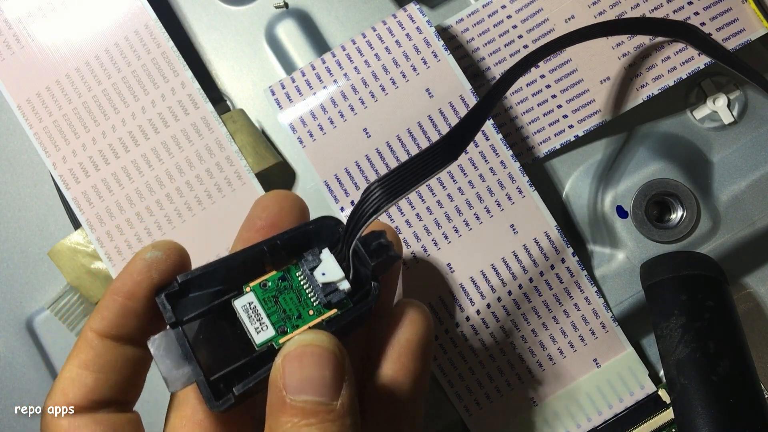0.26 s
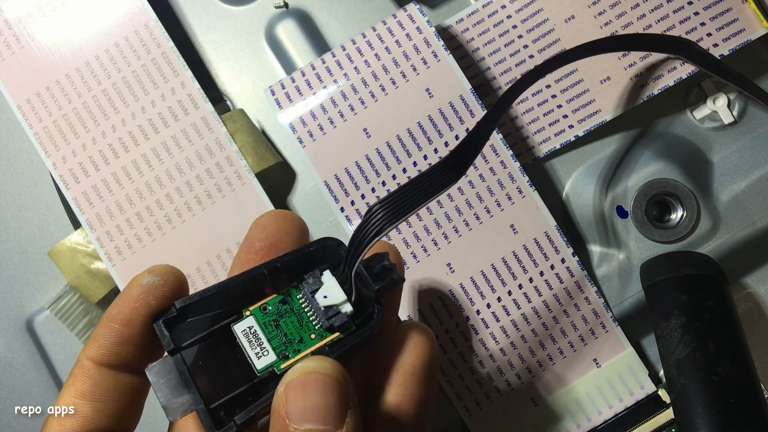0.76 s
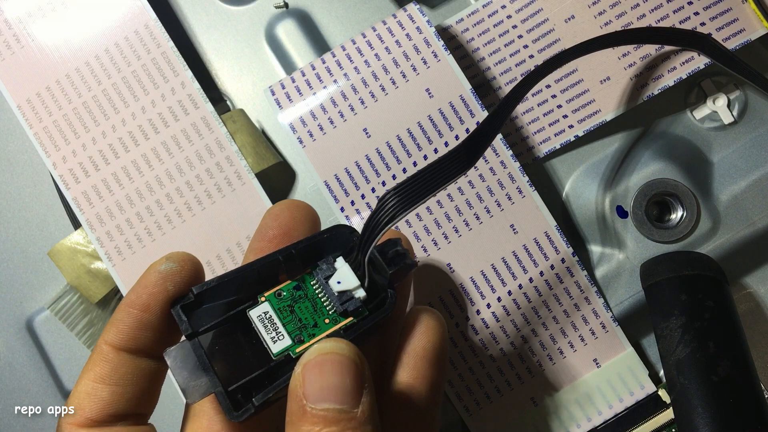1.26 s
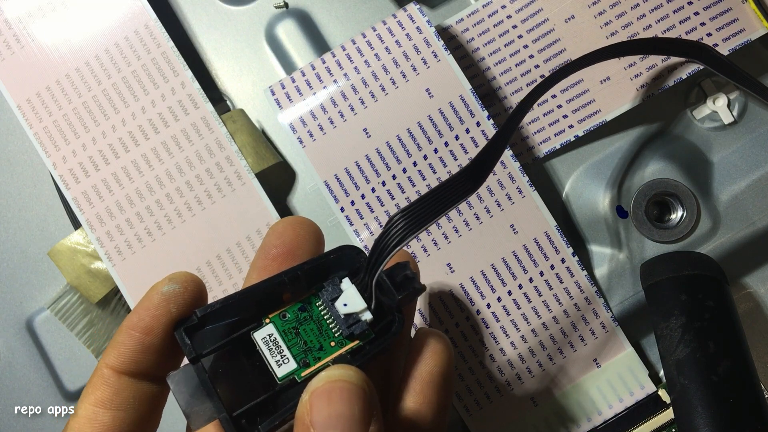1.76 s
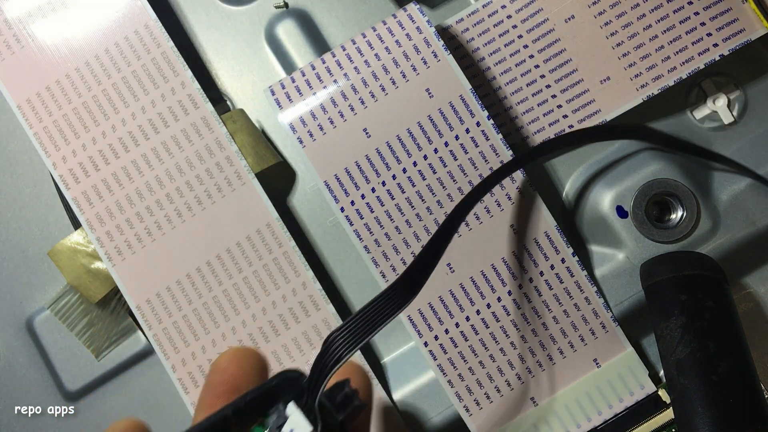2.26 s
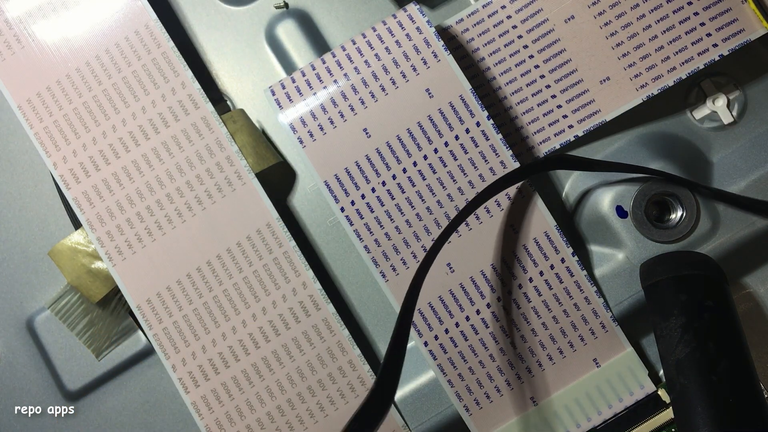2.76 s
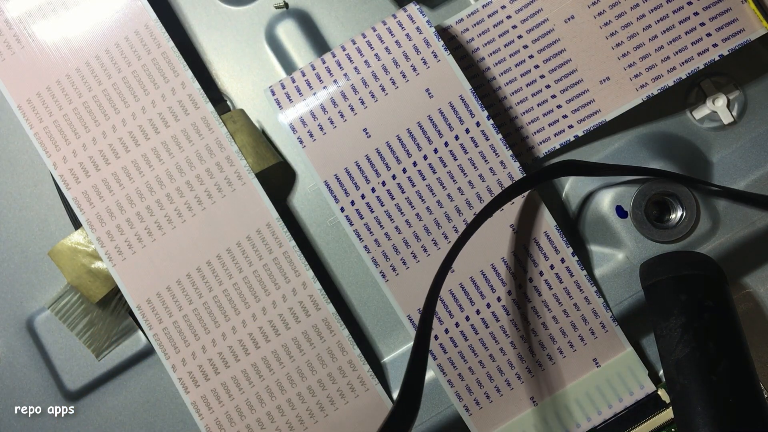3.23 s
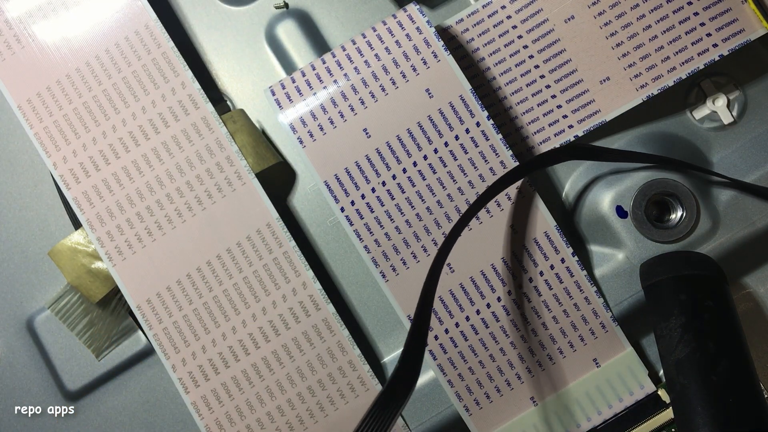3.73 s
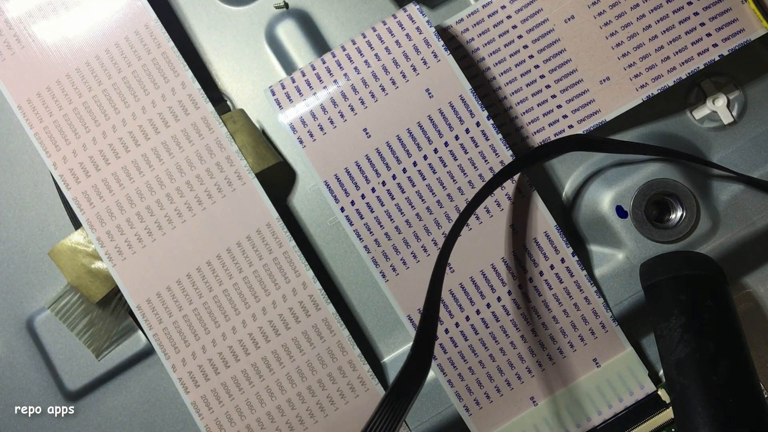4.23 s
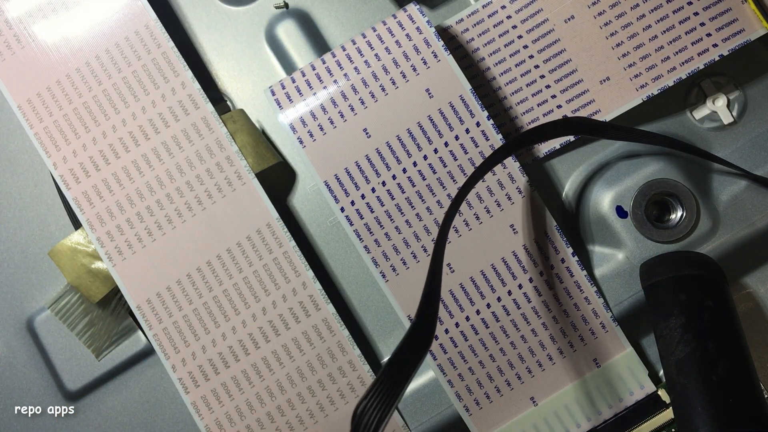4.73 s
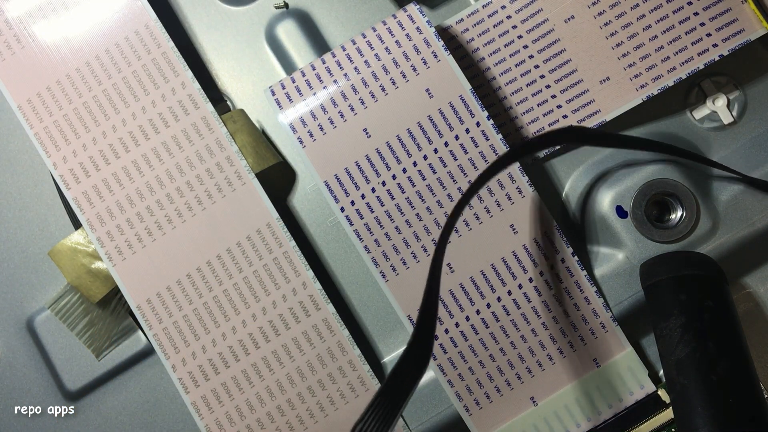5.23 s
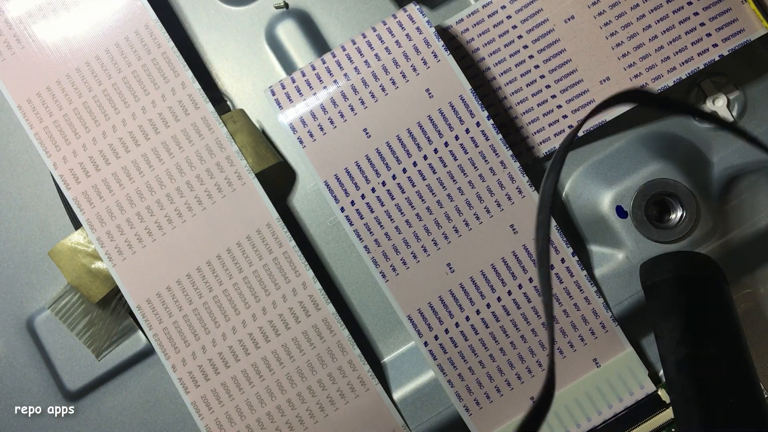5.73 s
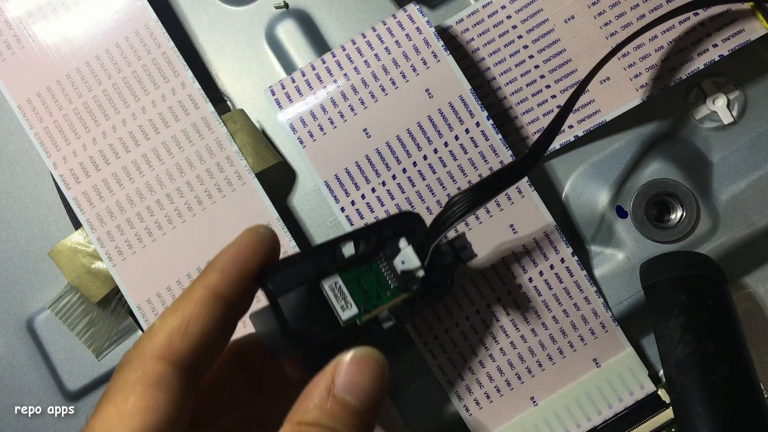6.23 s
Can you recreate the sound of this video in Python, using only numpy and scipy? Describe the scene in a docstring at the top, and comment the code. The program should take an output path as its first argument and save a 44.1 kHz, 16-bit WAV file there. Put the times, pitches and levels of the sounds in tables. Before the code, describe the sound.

A small plastic module is handled close up over a sheet-metal panel, in a small room with a very faint hum of air. A light tap comes right at the start. At 0.8 seconds a hard knock gives a sharp plastic crack, a brief metal ring and a low thump, followed by smaller taps near 1 and 1.5 seconds. Fingers and a cable rub softly, and two more knocks land around 2.2 and 2.4 seconds. From 3 seconds the handling turns busy, with quick taps, gritty scraping, panel rattle and thin, high clinks from a loose metal part. The loudest flurry of sharp knocks falls between 4.6 and 5 seconds. After that only soft rubbing remains, with a few small, dry plastic clicks from about 5.9 to 6.4 seconds.

```python
"""A small plastic module is turned in the hand, close up, and knocked on a sheet-metal panel.
Over a faint hum of air come light taps, then a hard knock at 0.8 s: the shell cracks, the panel rings,
its heavy frame thumps and a small cluttered room answers. Fingers and cable rub on, with more knocks
after 2.2 s. From 3 s the handling turns busy and a loose metal part clinks. The loudest flurry lands
between 4.6 and 5 s, and the scene tails off in soft rubbing and small plastic clicks."""
import sys
import numpy as np
from scipy import signal
from scipy.fft import rfft, irfft
from scipy.io import wavfile
from scipy.ndimage import uniform_filter1d

SR = 44100
rng = np.random.default_rng(int(sys.argv[2]) if len(sys.argv) > 2 else 0)


def to_wav(s):
    """Save 16-bit WAV."""
    ch = np.atleast_2d(s).T  # columns
    pcm = np.round(np.clip(ch, -1, 1) * 32767)  # PCM
    wavfile.write(sys.argv[1], SR, pcm.astype(np.int16))


N = 286209


def gain_of(db):
    """dB to amplitude."""
    return 10 ** (np.asarray(db) / 20)


def unit_rms(x):
    """Normalises to rms 1."""
    return x / np.sqrt(np.mean(x ** 2) + 1e-20)


def curve_at(points, hz):
    """Reads a curve on a log-frequency axis."""
    f, value = np.transpose(points)
    return np.interp(np.log(hz + 1), np.log(f + 1), value)


def add(mix, s, sound):
    """Mixes a sound in at time s."""
    part = mix[round(s * SR):][:len(sound)]
    part += sound[:len(part)]


def attack(size, rise_s):
    """A smooth fade-in."""
    return 1 - np.exp(-(np.arange(size) / (rise_s * SR)) ** 2)


def noise(spectrum, size, eq_db=lambda hz: 0):
    """Noise of rms 1 with the given spectrum and an extra EQ."""
    hz = np.fft.rfftfreq(size, 1 / SR)
    shape = gain_of(curve_at(spectrum, hz) + eq_db(hz))
    return unit_rms(irfft(rfft(rng.standard_normal(size)) * shape, size))


def resonate(x, hz, width_hz):
    """A sweepable band-pass: shifts hz down to zero, smooths, and shifts back."""
    turn = np.exp(2j * np.pi * np.cumsum(hz * np.ones(len(x))) / SR)
    pole = np.exp(-np.pi * width_hz / SR)
    return unit_rms((turn * signal.lfilter([1 - pole], [1, -pole], x / turn)).real)


def ring(modes, size, lift_db=0, tuning=0.96, damping=0.99, spread_db=0):
    """Struck modes at random phases; tuning multiplies their pitch, damping divides their t60."""
    hz, db, t60 = np.transpose(modes)[:, :, None]
    t = np.arange(size) / SR
    strike_spot = rng.standard_normal((len(modes), 1))  # makes each mode louder or softer
    height = gain_of(db + np.reshape(lift_db, (-1, 1)) + spread_db * strike_spot)
    tones = np.sin(2 * np.pi * (hz * tuning * t + rng.random(strike_spot.shape)))
    return (height * gain_of(-60 * damping * t / t60) * tones).sum(0) / np.linalg.norm(height)


# Room tone: f/Hz, level/dB
AIR_SPECTRUM = [(15, -38), (25, -10), (80, -0.5), (163, -6.5), (339, -2), (568, -15), (2090, -20),
                (2900, -26), (8830, -25), (10400, -29.5), (12900, -25), (15200, -31.5), (16500, -43)]


def air():
    """The bed: a faint, steady hum of air."""
    return gain_of(-69.5) * noise(AIR_SPECTRUM, N)


# Reverb time of the small room: f/Hz, t60/s
ROOM_DECAY = [(100, 0.25), (350, 0.32), (1000, 0.2), (2500, 0.36), (6400, 0.26), (14000, 0.21)]


def room(send):
    """Dense echoes build up quickly, and each band dies at its own speed."""
    hz, t, bands = signal.stft(rng.standard_normal(SR // 2), SR, nperseg=256)
    tail = signal.istft(bands * gain_of(-60 * t / curve_at(ROOM_DECAY, hz)[:, None]), SR, nperseg=256)[1]
    tail *= attack(len(tail), rise_s=0.0067)
    return signal.fftconvolve(send, tail / np.linalg.norm(tail))[:N]


def slips(per_s, spread_db):
    """Tiny contacts at random moments; a few are large."""
    strength = gain_of(spread_db * np.minimum(rng.exponential(1, N), 4))
    return strength * (rng.random(N) < per_s / SR) * rng.choice([-1, 1], N)


def loose_bits(spectrum, low_hz, high_hz, per_s, t60):
    """Twenty loose bits tick, each on its own short note."""
    t = np.arange(1500) / SR
    notes = (np.sin(2 * np.pi * hz * t) * gain_of(curve_at(spectrum, hz) - 60 * t / t60)
             for hz in np.geomspace(low_hz, high_hz, 20))
    return unit_rms(sum(signal.oaconvolve(slips(per_s, 3.5), note)[:N] for note in notes))


# Finger and cable cues: t/s at full level, swell/s per 20 dB (floored at 1/50), hold/s,
# fade/s per 20 dB (floored at 1/30), frame shudder/dB, panel rattle/dB, rub/dB, skin hiss/dB,
# rub resonance/Hz, hiss resonance/Hz, rasp amount
STROKE_CUES = [(0.0, .02, 0.0087, 0.08, -35, -51.5, -61, -62, 1196, 5580, .3),
               (0.19, 4.7, 0.017, 0.24, -49, -61.5, -64, -81, 1170, 5330, .45),
               (0.323, 0.6, 0.07, .5, -69, -79, -64.5, -68, 1700, 5900, .25),
               (0.382, -0.3, 0.016, 0.2, -78, -80, -63, -68.5, 1760, 5760, 0.14),
               (0.799, 0.2, 0.028, 0.37, -79, -77, -65.5, -69, 2050, 6340, .45),
               (0.849, -0.38, 0.11, .2, -52, -67, -61.5, -64, 1720, 4520, .55),
               (1.049, -0.13, 0.0091, 0.24, -47.5, -62.5, -57.5, -61, 1520, 4870, .45),
               (1.27, 0.1, 0.066, 0.4, -60, -70, -63, -67, 2062, 5430, .35),
               (1.398, 0.26, 0.11, 0.22, -63, -74.5, -58.5, -62, 1572, 5330, 0.15),
               (2.19, 0.33, 0.022, 0.26, -81, -74.5, -63.5, -68, 1950, 5200, .6),
               (2.25, .03, 0.09, 0.13, -66, -77, -63, -66, 1570, 4870, .45),
               (2.386, -0.1, .02, .15, -61, -70, -61, -61, 1285, 5110, .45),
               (2.523, -0.02, 0.0049, 0.17, -76, -58, -61.5, -89, 1160, 5830, .45),
               (2.549, -0.1, .02, .15, -76, -80, -74, -67.5, 1496, 6320, .4),
               (2.619, -0.8, 0.018, .25, -69, -70, -63, -71.5, 1645, 6710, .65),
               (3.064, 0.08, 0.056, -0.2, -63.5, -54, -58, -59, 1320, 5450, .6),
               (3.144, 0.02, 0.046, -0.04, -42, -42, -46.5, -59, 1290, 5440, .55),
               (3.241, 0.0563, 0.13, 0.0239, -42, -42.5, -48, -55, 1340, 5570, .46),
               (3.398, 0.01, 0.021, .08, -45, -46.5, -50, -59.5, 1227, 5100, 0.9),
               (3.531, 0.4, 0.064, 0.15, -50.5, -58.5, -71, -65, 1700, 5130, .45),
               (3.791, 0.15, 0.044, -0.37, -53, -56, -68, -87, 1296, 5040, .44),
               (3.891, 0.16, 0.07, 0.29, -52, -52, -59, -69, 1250, 5230, .4),
               (4.056, -0.02, 0.012, 0.17, -54.5, -56, -51.5, -67, 1157, 7200, .45),
               (4.16, -0.07, 0.065, -0.5, -53.5, -59, -70, -59, 1350, 5900, .78),
               (4.251, -0.33, 0.083, -0.36, -67, -68, -73, -60.5, 1520, 4850, 1.3),
               (4.307, -0.25, 0.039, 0.08, -48, -54.5, -64, -59, 1515, 4790, .6),
               (4.6, 0.7, .02, 1, -64, -67.5, -71.5, -76.5, 1250, 7600, .45),
               (4.633, -0.0744, .01, -0.03, -64, -36.5, -43.5, -75, 1384, 4660, .45),
               (4.757, 0.0462, 0.051, 0.06, -45.5, -45.5, -49.5, -49, 1360, 4520, .55),
               (4.871, 0.0969, 0.051, 0.0174, -46, -39.5, -49.5, -49.5, 1180, 4910, .45),
               (4.95, 0.0124, 0.026, 0.1079, -53.5, -35, -36.5, -39.5, 1400, 5380, .4),
               (5.06, 0, 0.018, 0.105, -54.5, -51.5, -51, -64, 1363, 5450, 0.32),
               (5.241, 0.5, .03, .04, -71, -69, -66.5, -74, 2160, 5000, 0.39),
               (5.294, .025, 0.038, 0.13, -61.5, -67, -71.5, -66.5, 1198, 9100, 1.56),
               (5.426, -0.36, 0.052, 0.02, -65, -71.5, -67, -67.5, 2550, 6240, 0.58),
               (5.653, 1, 0.057, -1.4, -78, -76, -79, -83, 1984, 6750, 0.87),
               (5.775, 0.07, .03, 0.55, -67, -79, -79.5, -72, 1820, 8730, 1.7),
               (5.863, 0, 0.064, 0.2, -72, -90, -64.5, -68.5, 2590, 6400, 2),
               (5.978, -0.07, 0.033, 0.66, -87, -72, -65.5, -76, 2493, 6290, 0.96),
               (6.107, 0, 0.0088, 0, -66, -58.5, -60, -72, 2134, 5580, 1.2),
               (6.254, -0.06, 0.043, -0.3, -80, -80.5, -68, -76, 2100, 6300, .9),
               (6.47, 0.2, .02, .05, -72, -88, -83, -82, 2245, 6060, 1.1)]
# Floor of the resting hand: shudder/dB, rattle/dB, rub/dB, hiss/dB
RESTING_LEVELS = [-69, -82.5, -84.5, -85]
# Its tone: rub resonance/Hz, hiss resonance/Hz, rasp amount
RESTING_TONE = [1500, 5800, .25]


def strokes():
    """Level and tone automation: each stroke swells, holds and fades; the strongest leads the tone."""
    s, swell, hold, fade, *columns = np.transpose(STROKE_CUES)[:, :, None]
    levels_db, tones = columns[:4], columns[4:]
    t = np.arange(0, N / SR, 1 / 1000)
    early = (s - t) / np.maximum(swell, 1 / 50)
    late = (t - s - hold) / np.maximum(fade, 1 / 30)
    power = gain_of(-40 * np.maximum(np.maximum(early, late), 0))
    faders = [np.sqrt((power * gain_of(2 * db)).sum(0) + gain_of(2 * rest))
              for db, rest in zip(levels_db, RESTING_LEVELS)]
    weight = power * gain_of(levels_db[2] + levels_db[3])  # by rub and hiss
    resting = gain_of(RESTING_LEVELS[2] + RESTING_LEVELS[3])
    colours = [((weight * tone).sum(0) + resting * rest) / (weight.sum(0) + resting)
               for tone, rest in zip(tones, RESTING_TONE)]
    return [np.interp(np.arange(N) / SR, t, lane) for lane in faders + colours]


# Midrange of rubbing skin and cable: f/Hz, level/dB
RUB_SPECTRUM = [(470, -32), (800, -6), (1040, -3), (1480, -6.5), (1760, -4), (2070, -8.5), (2490, -7),
                (5000, -20.5), (6500, -47.5), (11000, -120)]
# Dry top end of skin hiss and ticks: f/Hz, level/dB
TREBLE_SPECTRUM = [(2060, -26.5), (3500, -2.5), (3810, -6.5), (5070, -10.5), (5840, -8), (10800, -16),
                   (12900, -19.5), (15800, -24.5), (16200, -29), (16500, -52.5)]


def handling():
    """Small slips shake frame and panel; skin and cable rub in gritty bursts."""
    shudder_gain, rattle_gain, rub_gain, hiss_gain, rub_hz, hiss_hz, rasp = strokes()
    shudder = unit_rms(signal.oaconvolve(slips(60, 6.6), ring(FRAME_MODES, SR // 2))[:N])
    rattle = unit_rms(signal.oaconvolve(slips(400, 1.3), ring(PANEL_MODES, SR // 4))[:N])
    grit = 0.75 + 0.2 * unit_rms(signal.lfilter([1], [1, -0.996], abs(slips(250, 3))))
    rub, hiss = noise(RUB_SPECTRUM, N, shell_eq), noise(TREBLE_SPECTRUM, N)
    rub = 0.65 * rub + rasp * (resonate(rub, rub_hz, 200) + 0.44 * resonate(rub, 1.45 * rub_hz, 250))
    hiss = 0.79 * hiss + 0.5 * rasp * resonate(hiss, hiss_hz, 540)
    rattle += gain_of(-23.5) * loose_bits(TREBLE_SPECTRUM, 4100, 18000, per_s=25, t60=0.04)
    rattle += gain_of(-6.5) * loose_bits(RUB_SPECTRUM, 1000, 3600, per_s=9, t60=0.033)
    return shudder_gain * shudder + rattle_gain * rattle + grit * (rub_gain * rub + hiss_gain * hiss)


# Modes of the loose metal part, in low, middle and high groups: pitch ratio, level/dB, undamped t60/s
METAL_MODES = [
    [(.6, -2.5, .1), (.7, -7, 0.11), (.99, -1.5, .2), (1.0, 5, 0.16), (1.015, -14.5, .15)],
    [(.99, -10, .15), (1.0, 2, 0.23), (1.085, 2, .15), (1.1, -3, .15)],
    [(.985, 9, 0.15), (1.0, -5.5, 0.27), (1.012, 2, 0.22)],
]
# Clink cues: t/s, low/dB, middle/dB, high/dB, low pitch/Hz, middle pitch/Hz, damping factor
CLINK_CUES = [(3.09, -48.5, -56.5, -68, 5400, 8700, 0.93), (3.172, -40, -57, -64, 5410, 8850, 0.57),
              (3.262, -73, -55, -58, 5430, 8600, 0.98), (3.40, -77, -68, -75, 5430, 8750, 1.7),
              (3.769, -54, -63, -76, 5780, 8740, 1.07), (3.885, -54, -62, -70, 5570, 8750, 0.78),
              (4.084, -70, -44, -47, 5430, 8140, 1.3), (4.102, -42, -66, -60, 6350, 9200, 2.3),
              (4.293, -49, -61, -75, 4670, 8500, 1.3), (4.321, -42, -72, -69, 4660, 8750, 4.6),
              (4.734, -50, -52, -49, 5430, 8400, 0.76)]


def clinks(high_hz=12900):
    """The loose metal part keeps rattling as it rings, so its notes are rough."""
    out, size = np.zeros(N), SR // 4
    for s, *levels_db, low_hz, middle_hz, damping in CLINK_CUES:
        for modes, db, hz in zip(METAL_MODES, levels_db, (low_hz, middle_hz, high_hz)):
            rattle = unit_rms(uniform_filter1d(rng.standard_normal(size), size=120))
            note = ring(modes, size, tuning=hz, damping=damping, spread_db=-0.5)
            add(out, s, gain_of(db) * note * (1 + 0.8 * rattle))
    return out


def focus(modes, centre_hz, db_per_octave):
    """Modes close to the favoured pitch are driven hardest."""
    return -db_per_octave * abs(np.log2(np.transpose(modes)[0] / centre_hz))


# Modes of the heavy frame, before tuning and damping: f/Hz, level/dB, t60/s
FRAME_MODES = [(45, -8.5, 0.35), (56.1, -11.5, 0.71), (58.6, 1.5, 0.26), (73.2, 2, 0.27), (93, -8.5, 0.27),
               (131.4, 0.5, 0.16), (170.5, -5.5, 0.14), (199, -5.5, 0.15)]


def frame_thump():
    """The low end of a knock: the heavy frame gets going late."""
    drive_db = focus(FRAME_MODES, centre_hz=73.6, db_per_octave=4)
    return ring(FRAME_MODES, SR // 2, drive_db, spread_db=-3) * attack(SR // 2, rise_s=0.0029)


# Modes of the sheet metal, before tuning and damping: f/Hz, level/dB, t60/s
PANEL_MODES = [(250.8, 0, 0.11), (333.4, 0, 0.096), (362.7, -7.5, .2), (384, -0.5, 0.093),
               (452, -6.5, 0.14), (515.4, -8.5, 0.19), (555.5, 0.5, 0.089), (620, -14.5, 0.05),
               (661, 7, 0.045), (797, -6, 0.12), (886, -2.5, 0.12), (922, -0.5, 0.083), (1019, 2.5, 0.075)]


def panel_ring(rise, panel_hz, focus_db, damping):
    """The body of a knock: the sheet rings around a favoured pitch, damped by the hand."""
    drive_db = focus(PANEL_MODES, panel_hz, focus_db)
    return rise * ring(PANEL_MODES, len(rise), drive_db, damping=damping, spread_db=1)


# Resonances of case and board: f/Hz, width/Hz, weight/dB (scales the boost)
SHELL_PEAKS = [(1349, 8.7, -10.5), (2000, 5, -5), (2272, 45, 6), (2470, 24, -1.5), (2800, 25, -25),
               (3450, 32, -10), (4080, 480, -6.5), (4070, 160, -9.5)]


def shell_eq(hz):
    """Each resonance of the case boosts a narrow band; returns dB."""
    return sum(3.7 * gain_of(db / 1.9) / (1 + (2 * (hz - f) / width) ** 2) for f, width, db in SHELL_PEAKS)


def clutter_eq(hz):
    """Many small resonances, new ones for every grip; returns dB."""
    ripple = uniform_filter1d(rng.standard_normal(len(hz)), size=50)
    return 5 * unit_rms(uniform_filter1d(ripple, size=50))


def chatter(carrier, contact, bounces):
    """The carrier in bouncing contact, with the energy of a smooth contact."""
    sound = carrier * contact * bounces
    return sound * np.linalg.norm(contact) / np.linalg.norm(sound)


# Crack of the plastic shell: f/Hz, level/dB
CRACK_SPECTRUM = [(290, -20.5), (500, -11), (983, -4), (1430, -4.5), (1990, -4.5), (5080, -16),
                  (6000, -16.5), (7800, -45.5), (13200, -120)]
CRACK_T60_S, TICK_T60_S = 0.24, 0.17  # scatter from the clutter near the hand
TICK_SHARE = 0.59  # of the contact's decay time


def shell_snap(rise, hollow, shell_hz, contact_ms, echo_db):
    """The transient: a few ms of chattering contact make a crack and a tick; clutter scatters both."""
    size = len(rise)
    t = np.arange(size) / SR
    decay = np.exp(-1000 * t / contact_ms)
    bounces = gain_of(1.6 * unit_rms(uniform_filter1d(rng.standard_normal(size), size=30)))
    scatter = gain_of(echo_db - 11.5) * np.sqrt(contact_ms / 3.7) * attack(size, rise_s=0.012)
    broad = noise(CRACK_SPECTRUM, size, lambda hz: shell_eq(hz) + 0.43 * clutter_eq(hz))
    bright = noise(TREBLE_SPECTRUM, size, lambda hz: 0.5 * clutter_eq(hz))
    shell = 0.56 * broad + hollow * resonate(broad, shell_hz, 600)
    crack = chatter(shell, rise * decay, bounces) + shell * scatter * gain_of(-60 * t / CRACK_T60_S)
    tilt = -0.7 - 0.22 * echo_db  # dB per octave: drier hits are brighter
    sharp = noise(TREBLE_SPECTRUM, size, lambda hz: tilt * np.log2((hz + 1) / 4000) + 0.5 * clutter_eq(hz))
    tick = gain_of(1.5) * chatter(sharp, rise * decay ** (1 / TICK_SHARE), bounces)
    tick += bright * scatter * gain_of(-60 * t / TICK_T60_S)
    return crack, tick


# Knock cues, levels before the mix trims: t/s, hollowness, panel focus/dB per octave, crack/dB, thump/dB,
# ring/dB, tick/dB, shell pitch/Hz, favoured panel pitch/Hz, contact/ms, hand damping factor, echo send/dB
KNOCK_CUES = [(0.0297, 0.8, 10, -52, -48, -41, -54.5, 921, 571, 7.8, 1.9, 2),
              (0.094, .99, 15.5, -24, -46, -25.5, -39.5, 920, 509, 3.25, 1.94, 1.5),
              (0.2818, .7, 8, -40.5, -53, -53, -48.5, 1210, 266, 4.4, 2.5, -5.5),
              (0.82, 0.17, 12.5, -7, -20, -20.5, -23, 1334, 358, 4, 3.05, -4.5),
              (0.8484, 0.8, 8, -14.5, -67.5, -27.5, -40, 2440, 332, 1.7, 1.74, -18.5),
              (1.0296, 0.2, 28, -20, -32, -52, -31, 770, 743, 4.6, 1.5, -8),
              (1.5397, 0.45, 12.5, -28.5, -34, -40, -47, 1690, 258, 4.3, 1.86, -4.5),
              (2.2147, .99, 12.5, -13.5, -21.5, -33, -30.5, 1380, 245, 3.3, 0.91, -11),
              (2.2636, .99, 11, -29.5, -24, -65, -47.5, 923, 231, 4.7, 1.8, -10),
              (2.368, .74, 16.5, -19, -24.5, -31.5, -26.5, 1270, 277, 3.4, 1.23, -10),
              (2.5092, 1, 16, -43.5, -63, -41, -79, 910, 310, 4.8, 2.1, -4),
              (2.5497, 0.4, 13, -50, -63, -84, -54.5, 824, 269, 3.4, 1.5, 3.5),
              (2.6483, .95, 11, -47.5, -66, -58, -66, 2000, 436, 6.3, 1.75, -19),
              (3.0176, 0.6, 4, -50, -44, -46, -62.5, 853, 258, 6.1, 2.75, 2),
              (3.041, .9, 9, -38.5, -52, -45, -43, 1710, 231, 5.7, 2.5, -4),
              (3.0574, .9, 8, -53, -52, -44.5, -57, 829, 300, 3.6, 1.6, 6.5),
              (3.0659, .99, 12, -42, -38.5, -39, -69, 891, 700, 6.9, 1.57, -1.5),
              (3.1413, 1.4, 0, -18, -45, -20, -54, 1260, 900, 3.1, 5.4, -6),
              (3.209, 0, 12, -28.5, -55, -36.5, -39, 848, 694, 4.2, 1.12, 5),
              (3.2255, 0.6, 4, -32, -55, -42, -55, 840, 694, 7, 1.1, 0),
              (3.2635, .99, 10, -27, -55, -38.5, -63, 1390, 334, 7, 0.52, -9),
              (3.3101, .6, 25, -46.5, -44, -37, -47, 1070, 501, 6.2, 1.5, 4.7),
              (3.3932, 0.5, 17.5, -48, -50, -37, -56, 1040, 506, 5.8, 1.3, -10),
              (3.4885, 0.9, 4, -33, -40, -25, -69, 910, 900, 7.7, 3.94, -4.5),
              (3.5018, .7, 23, -36, -44, -37, -40, 4070, 371, 5.6, 1.5, -2),
              (3.5202, 0.6, 18, -38, -51, -70, -42.5, 810, 331, 4.5, 1.5, -8),
              (3.696, .7, 10, -65, -63, -49, -66, 840, 447, 2.8, 1.44, -7),
              (3.769, .99, 28, -32.5, -51, -49, -76, 1260, 393, 5.8, 0.85, -2.5),
              (3.8144, .99, 6, -49, -44, -36.5, -88, 920, 366, 3.5, 1.75, -5.5),
              (3.875, .99, 13, -31, -52, -50, -62, 1140, 711, 12.2, 1.73, 0.5),
              (3.8874, 1, 10, -33, -42, -41, -60, 1040, 510, 8.2, 2.1, -2),
              (3.8989, .7, 32, -46, -35.5, -44, -46, 1310, 398, 3.1, 1.7, -7),
              (4.0597, .42, 16, -39, -56.5, -45.5, -46, 1050, 708, 5.1, 0.86, 4.5),
              (4.086, .95, 34, -30, -45, -39, -36, 904, 525, 3.3, 1.7, -2.5),
              (4.1603, .95, 10.5, -41.5, -55, -31.5, -69, 826, 662, 13, 1.93, -3.5),
              (4.1745, .99, 23, -41.5, -49.5, -51.5, -49.5, 815, 320, 6.7, 0.65, -3),
              (4.1987, .7, 16, -54, -53, -45.5, -63, 1010, 336, 2.4, 1.7, -11),
              (4.2876, 1, 27, -26, -48.5, -29, -47.5, 920, 522, 5.1, 1.25, -10),
              (4.347, .87, 19, -46.5, -58, -39.5, -69, 900, 528, 1.9, 1.1, -11.5),
              (4.622, 0.8, 3, -5, -37.5, -6.5, -31, 863, 506, 5, 5.2, -2),
              (4.655, .99, 6.5, -14, -44, -24, -38.5, 870, 398, 3.8, 1.4, -0.5),
              (4.7312, 0.4, 12, -8, -30.5, -17.5, -34, 1560, 301, 4.4, 2.83, -1),
              (4.7377, 0.45, 11, -16.5, -32, -15.5, -37.5, 1080, 633, 8.5, 1.16, -9.5),
              (4.7977, 0.7, 11, -18, -49.5, -46, -59, 902, 517, 3.8, 2.5, 1),
              (4.8425, .99, -11, -18.5, -36.5, -23.5, -41.5, 900, 504, 5.5, 2.9, -8.5),
              (4.9242, 0.6, 11, -26, -39, -54.5, -31.5, 880, 323, 3, 1.7, -12),
              (4.9448, .7, 20, -24, -48.5, -28, -29, 893, 520, 4.7, 1.03, -5),
              (4.966, 0.75, 30, -18.5, -33.5, -27.5, -37.5, 1040, 510, 8.8, 2.2, 3.5),
              (5.6438, 0.74, 13, -58, -79, -64, -71, 1720, 253, 4.0, 1.6, -1),
              (5.776, 0.8, 10, -53, -69, -57, -78.5, 1900, 231, 4.0, 1.8, -15.5),
              (5.9011, 1, 11, -38.5, -69, -75, -48.5, 2560, 315, 5.2, 1.45, -6.5),
              (5.9319, .54, 17, -60, -70, -67, -48.5, 2540, 266, 3.4, 1.5, -5),
              (5.955, 1, 11, -38.5, -70, -63, -62, 2470, 266, 4.5, 1.5, -5.5),
              (5.998, .43, 14, -38, -61, -62, -55, 1650, 242, 3.3, 1.3, -3),
              (6.0545, 0.9, 16, -27.5, -66, -82, -57, 2220, 799, 6.3, 1.2, -16),
              (6.2533, .83, 11, -46, -82.5, -83, -75, 2030, 258, 3.7, 1.2, -12),
              (6.3247, 0.3, 19, -20, -54, -57, -35, 1810, 266, 1.87, 0.66, -17.5),
              (6.401, 0.4, 11, -49.5, -60, -83, -58, 2170, 310, 4.2, 1.5, -10),
              (6.4692, 0.7, 12, -53, -71, -81, -64.5, 3480, 258, 4.7, 1.5, -10)]


def knocks():
    """The module hits the panel; ring and thump feed four room sends in turn, so neighbours differ."""
    direct, sends = np.zeros(N), np.zeros((4, N))
    for k, (s, hollow, focus_db, crack_db, thump_db, ring_db, tick_db,
            shell_hz, panel_hz, contact_ms, damping, echo_db) in enumerate(KNOCK_CUES):
        rise_s = 0.0015 + 0.0002 * damping  # a firmer hand softens the blow
        rise, start = attack(SR // 3, rise_s), s - rise_s
        crack, tick = shell_snap(rise, hollow, shell_hz, contact_ms, echo_db)
        panel = gain_of(ring_db + 7) * panel_ring(rise, panel_hz, focus_db, damping)
        body = gain_of(thump_db) * frame_thump()
        add(body, 0, panel)
        add(direct, start, gain_of(crack_db - 4.5) * crack + gain_of(tick_db + 5) * tick)
        add(direct, start, body)
        add(sends[k % len(sends)], start, gain_of(echo_db) * body)
    return direct, sends


def scene():
    """The mono mix: knocks, clinks, room returns, handling and air."""
    direct, sends = knocks()
    return (direct + clinks() + sum(room(send) for send in sends) + handling() + air())[None]


def record(dry):
    """The deepest bass is cut and the top treble dulled; a steep high cut follows."""
    low_cut = signal.sosfilt(signal.butter(2, 45, "highpass", fs=SR, output="sos"), dry)
    shelf = signal.firwin2(255, [0, 15600, 15950, SR / 2], gain_of([0, 1, -15, -11.5]), fs=SR)
    high_cut = signal.firwin(511, 16700, window=("kaiser", 9), fs=SR)
    return signal.oaconvolve(low_cut, np.convolve(shelf, high_cut)[None], "same")


dry = scene()
out = record(dry)
to_wav(out)
```